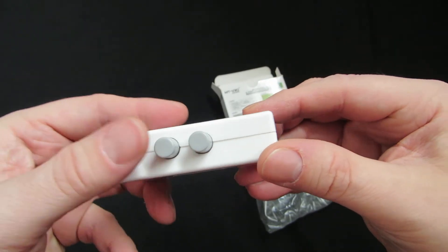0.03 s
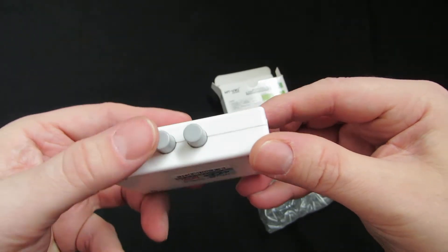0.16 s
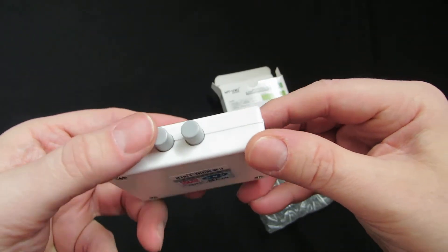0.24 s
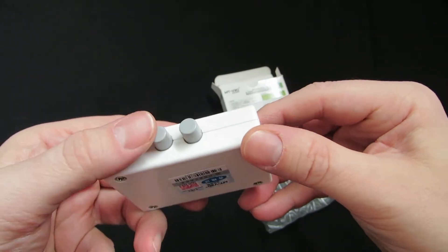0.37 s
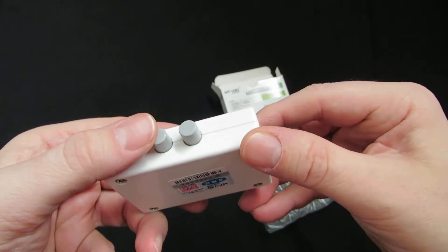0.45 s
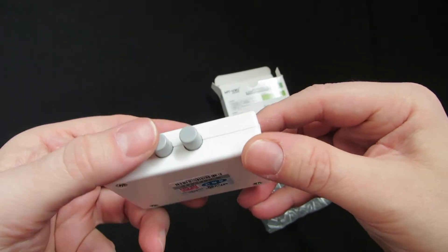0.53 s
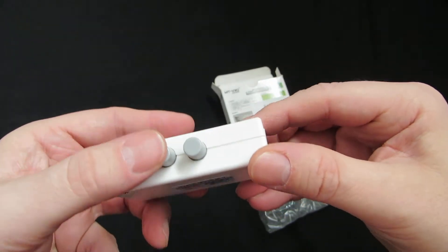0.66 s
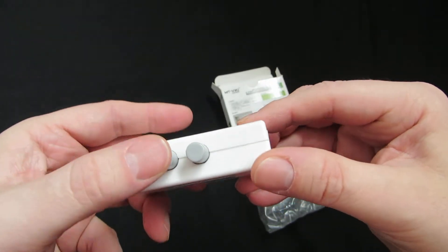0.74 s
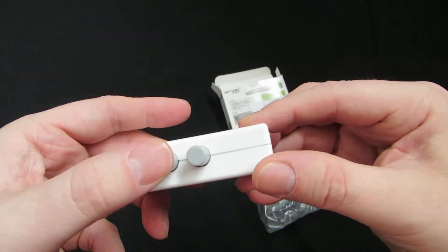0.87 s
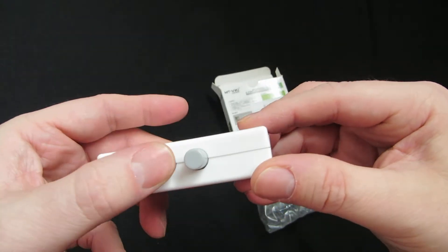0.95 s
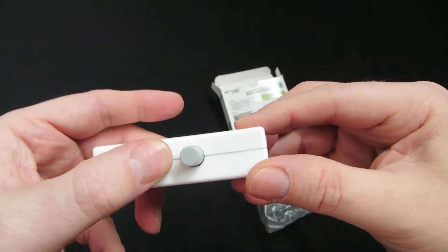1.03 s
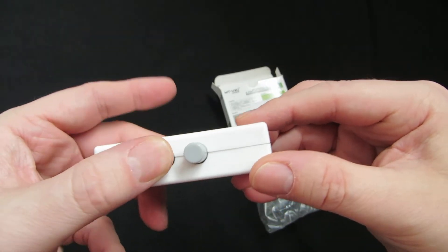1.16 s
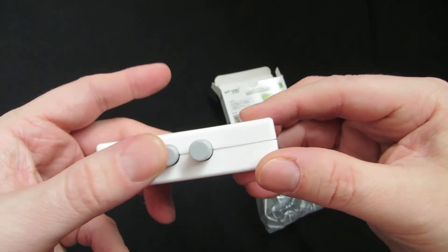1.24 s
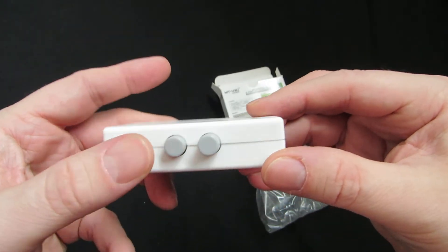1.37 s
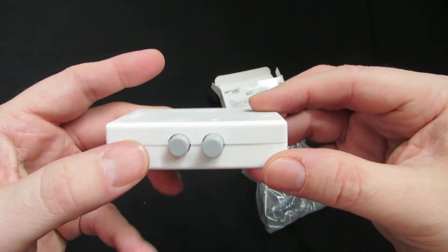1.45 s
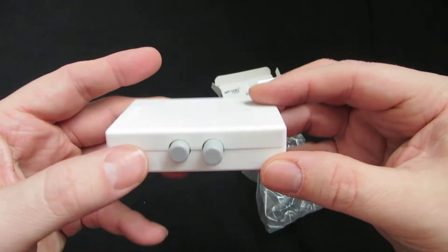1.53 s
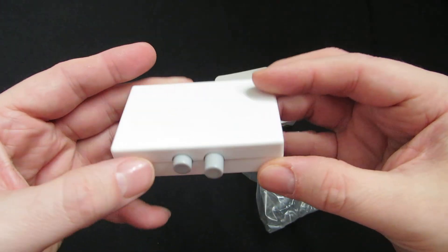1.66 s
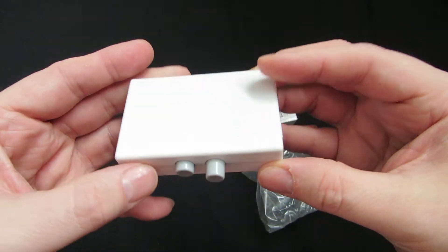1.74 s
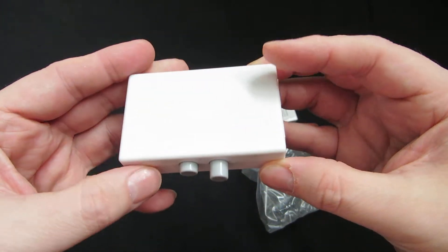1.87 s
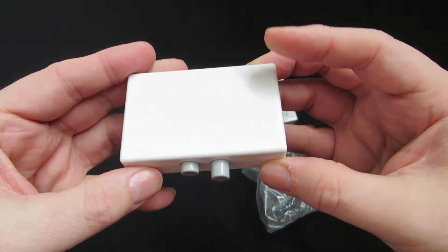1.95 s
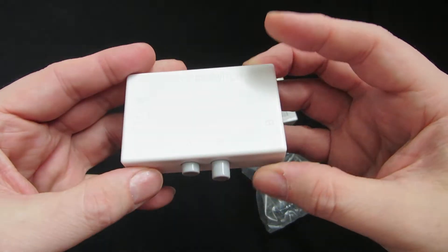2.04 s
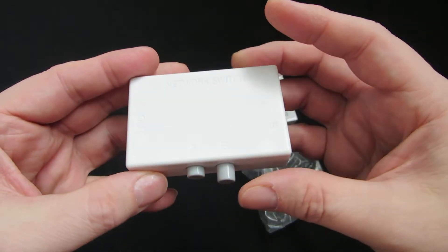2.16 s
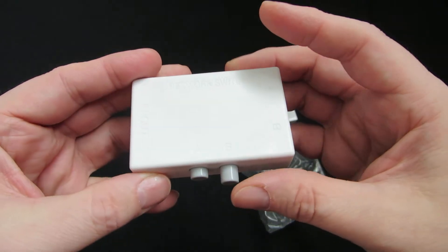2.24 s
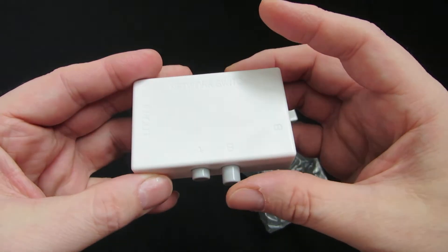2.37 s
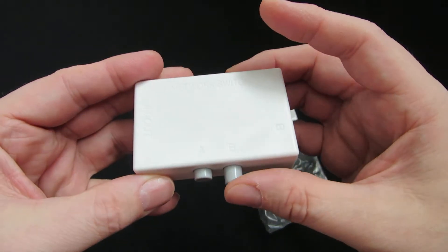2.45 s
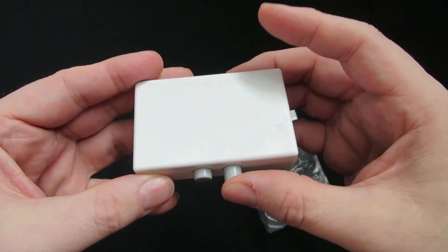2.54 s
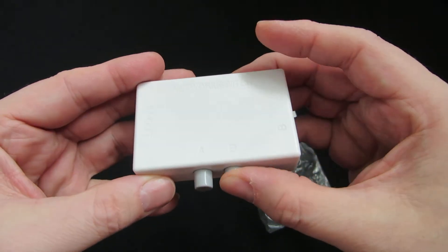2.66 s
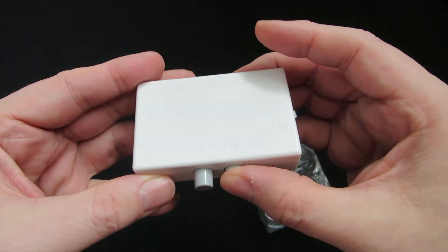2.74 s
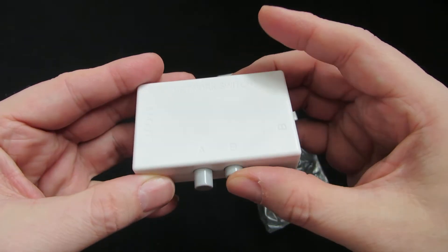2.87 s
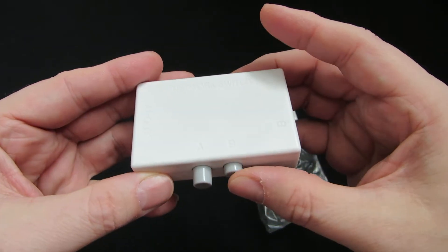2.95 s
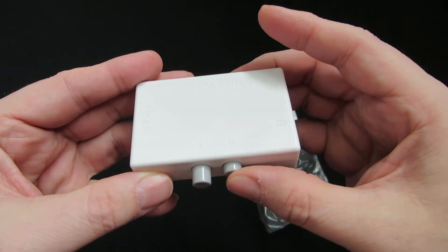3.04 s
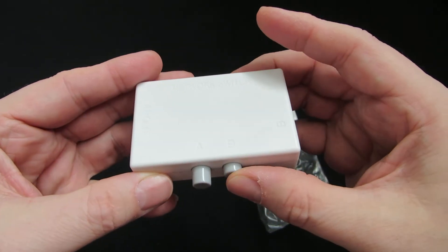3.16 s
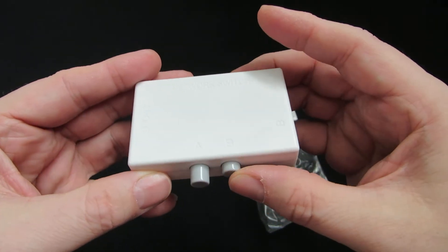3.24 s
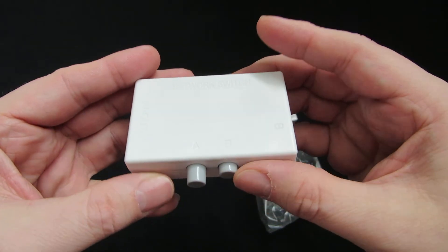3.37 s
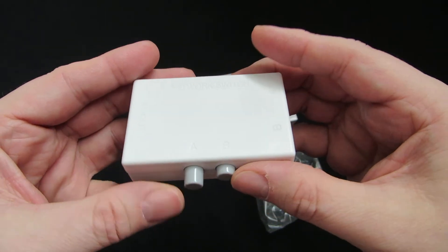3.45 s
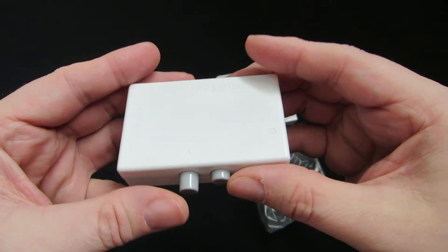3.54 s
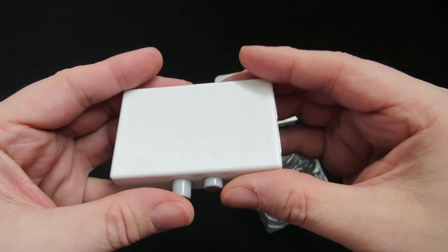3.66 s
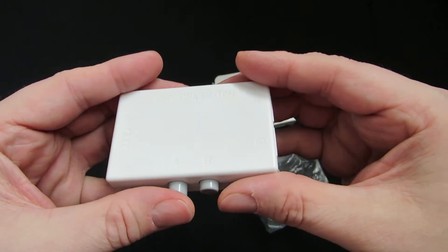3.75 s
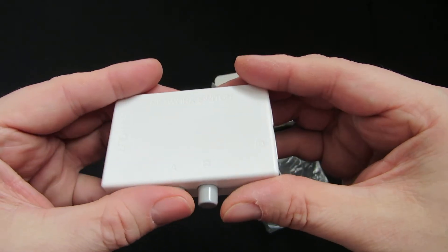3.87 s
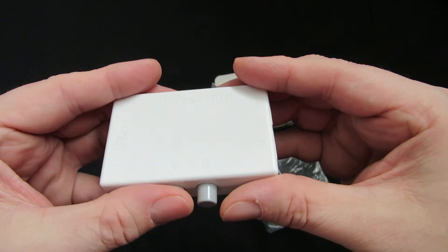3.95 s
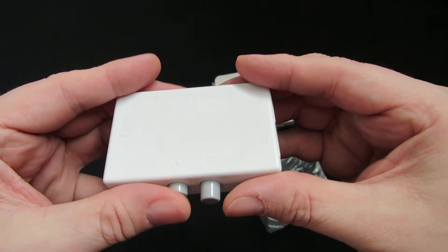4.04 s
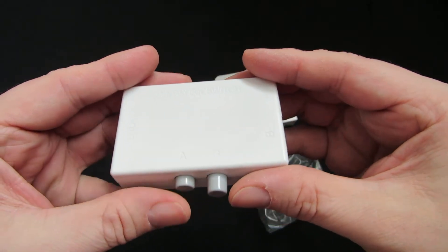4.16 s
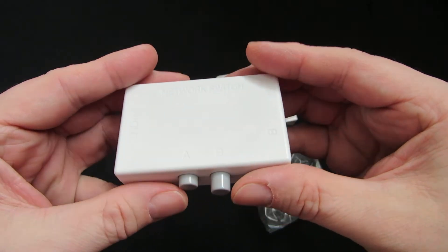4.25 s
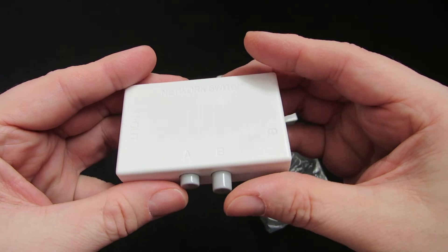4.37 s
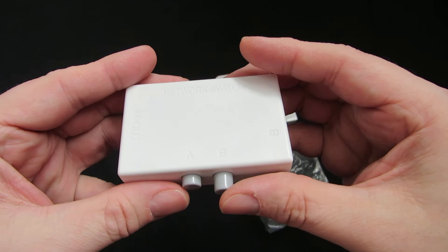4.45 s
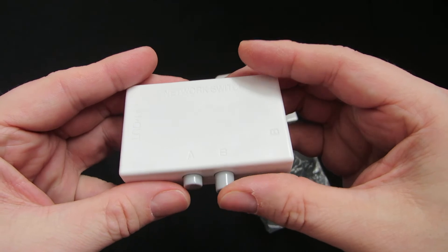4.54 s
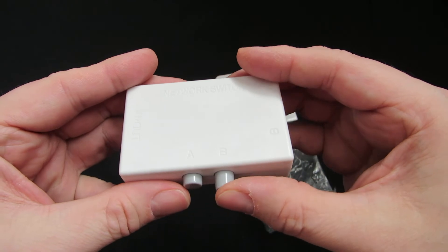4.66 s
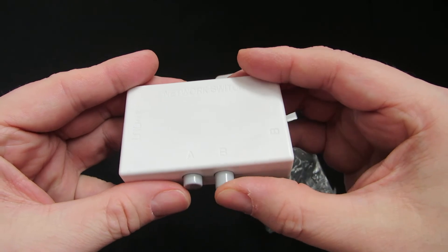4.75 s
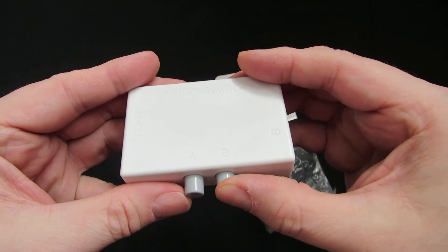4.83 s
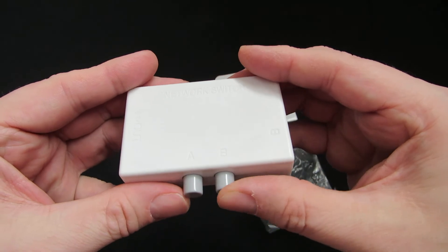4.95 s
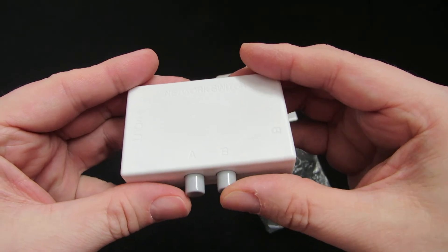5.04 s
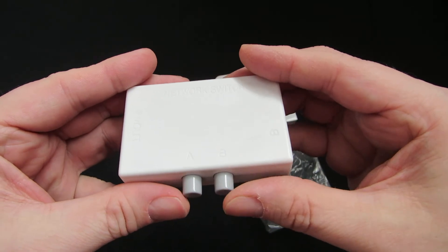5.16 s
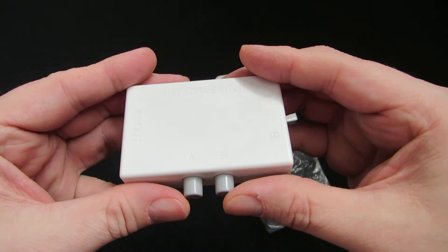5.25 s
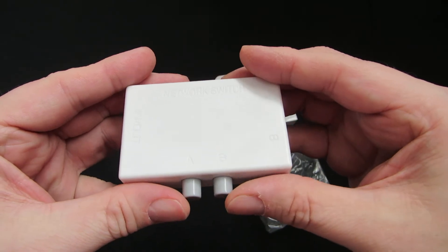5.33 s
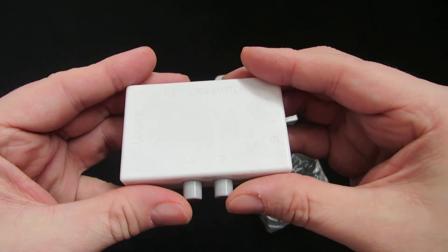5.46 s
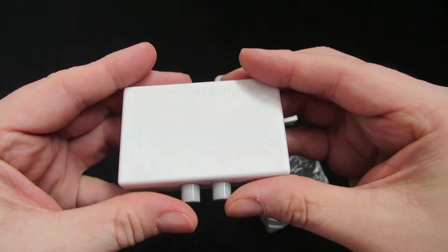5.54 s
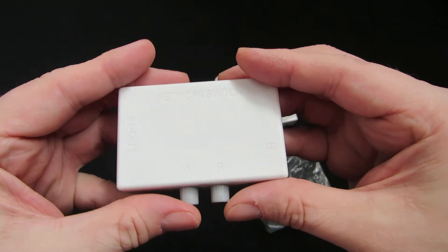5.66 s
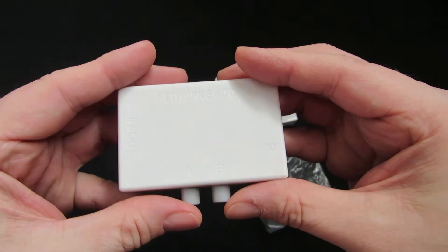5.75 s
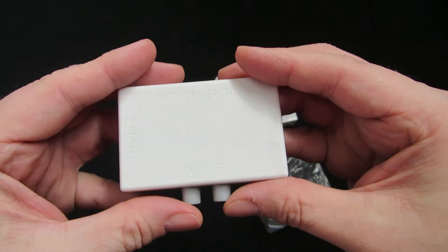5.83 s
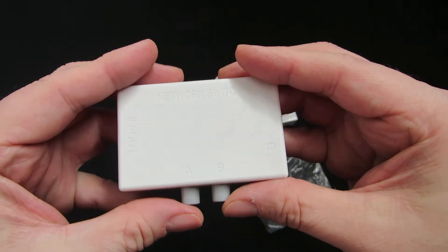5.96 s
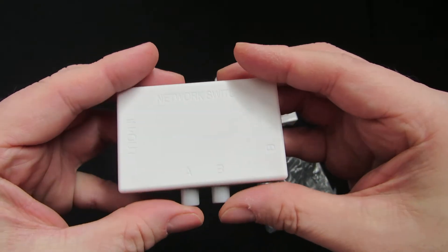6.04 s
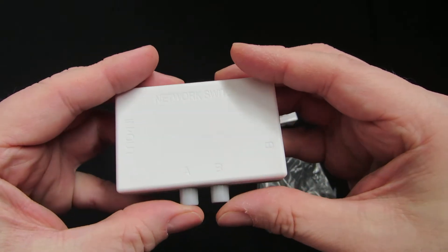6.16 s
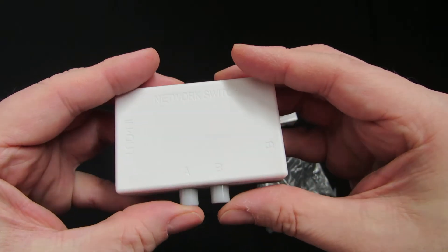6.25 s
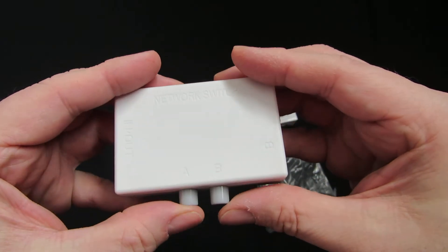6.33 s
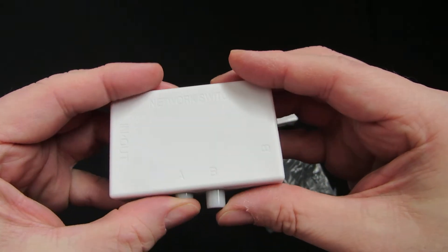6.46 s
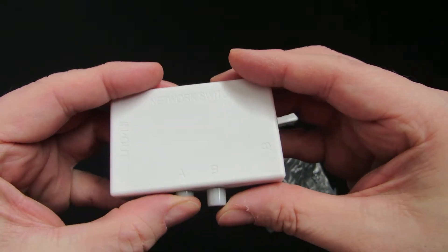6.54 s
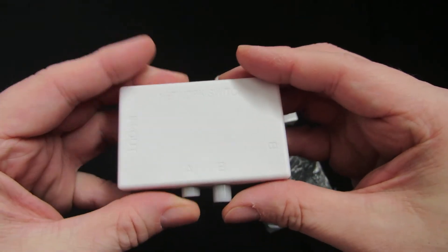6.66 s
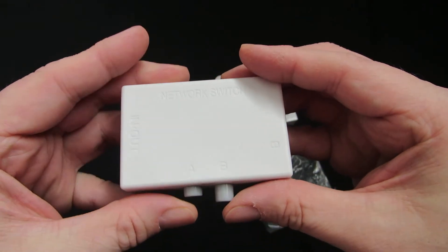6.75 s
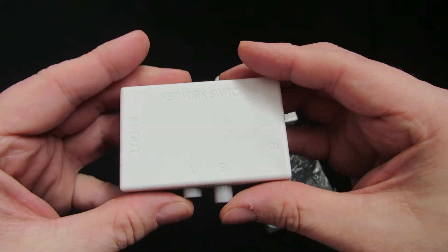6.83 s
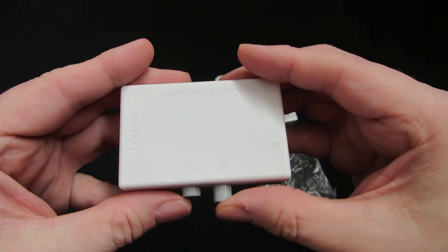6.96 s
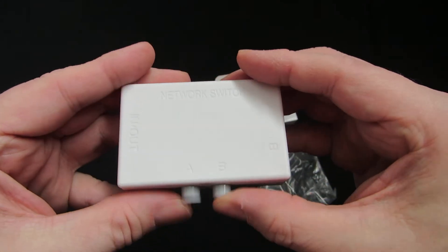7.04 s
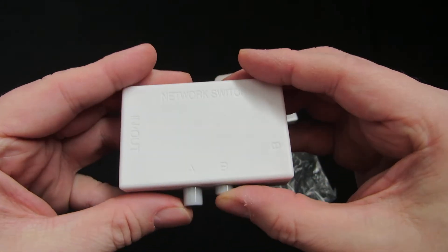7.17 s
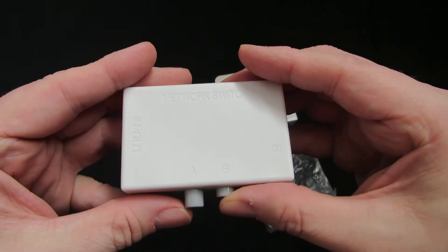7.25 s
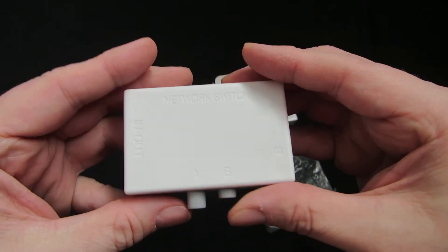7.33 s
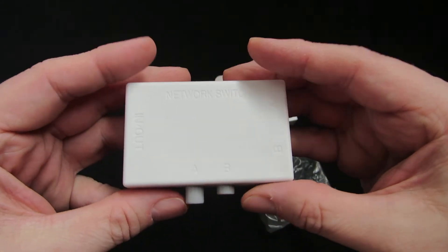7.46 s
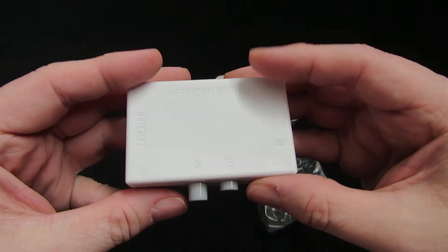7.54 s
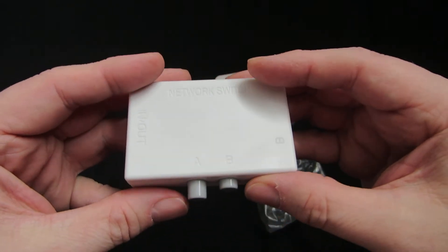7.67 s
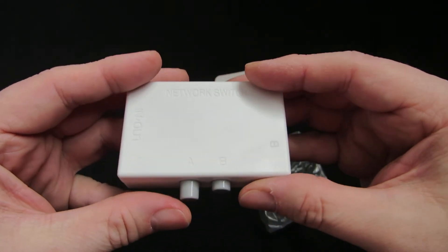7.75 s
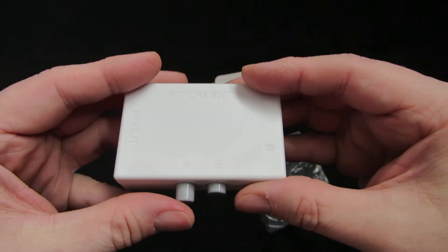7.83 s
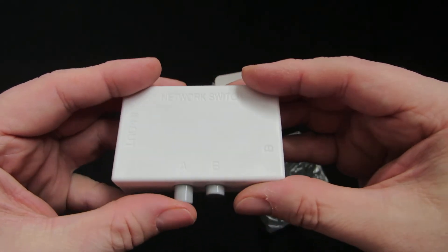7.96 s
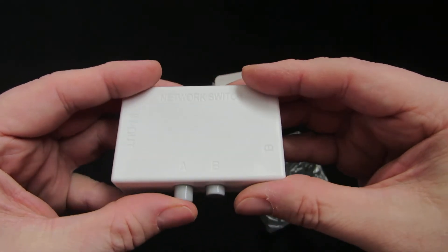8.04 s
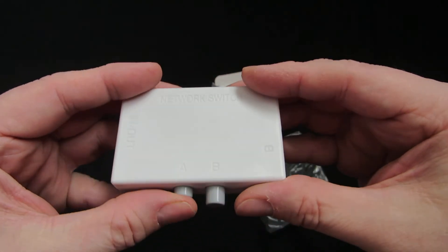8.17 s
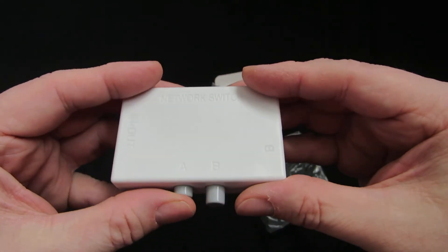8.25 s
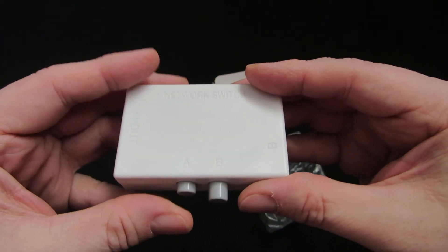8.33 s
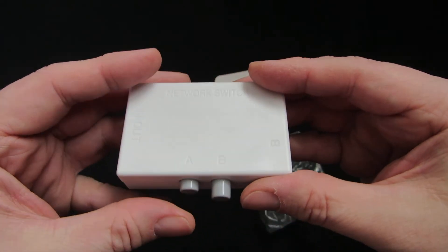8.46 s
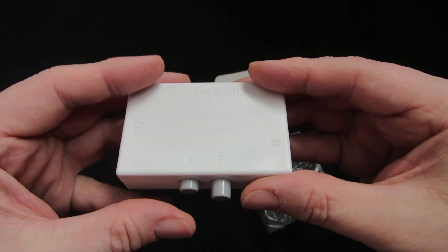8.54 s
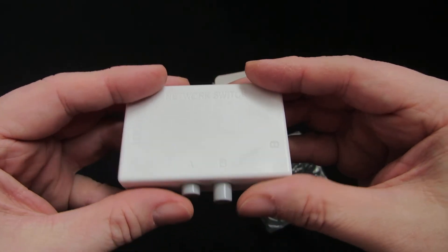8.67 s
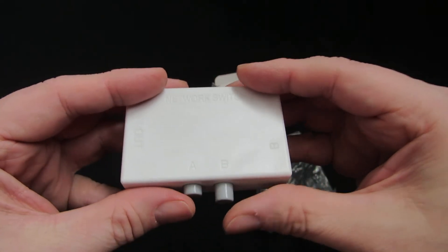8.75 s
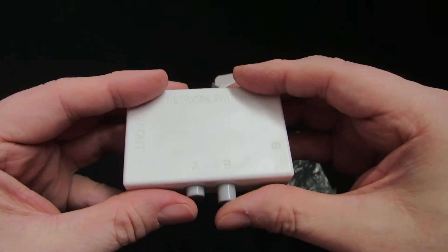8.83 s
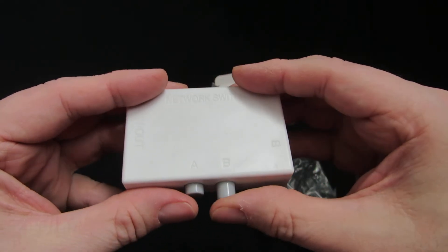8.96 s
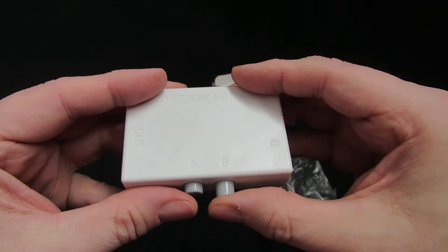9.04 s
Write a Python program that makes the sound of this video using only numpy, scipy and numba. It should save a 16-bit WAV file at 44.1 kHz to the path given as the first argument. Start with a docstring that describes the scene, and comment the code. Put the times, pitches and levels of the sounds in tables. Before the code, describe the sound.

Very close in a small, fairly dry room, thumbs press stiff latching buttons on a little hollow plastic box. Hard, bright clacks come singly or in clusters of small ticks, separated by pauses of a second or so. Brief gritty plunger scrapes lead into some snaps, and a faint steel spring sings after the harder ones. Steady wide microphone hiss lies underneath.

```python
"""A small room: thumbs work two latching push buttons on a little hollow plastic box, close to a camera.
Each impact is a short burst of rattling force driven through the ringing modes of the shell.
Plunger scrapes are swelling grit through the same shell; after some hard snaps steel springs sing as sines.
A short noise tail is the room; wide coloured noise and a faint whine are the camera's hiss.
The camera ducks its gain after loud peaks, clips hard and cuts the extreme top."""
import sys
import numpy as np
from scipy import signal
from scipy.fft import rfft, irfft, next_fast_len
from scipy.io import wavfile
from scipy.ndimage import uniform_filter1d, minimum_filter1d
from numba import njit

SR = 44100
rng = np.random.default_rng(int(sys.argv[2]) if len(sys.argv) > 2 else 0)


def waveform_to_disk(signal):
    """Save audio, clipped to [-1, 1], as 16-bit WAV at the path in sys.argv[1]."""
    frames = np.transpose(np.atleast_2d(signal))
    scaled = np.clip(frames, -1, 1) * 32767
    samples = np.round(scaled).astype(np.int16)
    wavfile.write(sys.argv[1], SR, samples)


N = 401310

# microphone noise colour, sum and difference of the channels: [f/Hz, density level/dB]
HISS_MID_COLOUR = [(12, -40.5), (20, -6.5), (55, 0), (187, -6.5), (222, -5), (366, -5), (573, -8),
                   (1000, -2), (1480, -8), (1610, -8), (4940, -12.5), (11100, -18.5), (16000, -24.5)]
HISS_SIDE_COLOUR = [(12, -35.5), (20, -9.5), (68, -2.5), (234, -1), (277, 0.5), (356, -1.5), (471, -3.5),
                    (737, 1), (6910, -17.5), (13900, -29), (16000, -32)]
# button parts hitting their stops, levels ahead of pan and bass cut:
# [t/s, level/dB, low knock re snap/dB, shell thump re snap/dB, bright tick re snap/dB, rattle decay/ms]
IMPACTS = [(0.9071, -43, -15.5, -25, -11, 0.6), (0.9687, -32, -26, -28, -14, 3.1),
           (0.9721, -29.5, -6, -17, -6, 1.7), (1.0083, -13.5, -15, -5.5, -10.5, 0.92),
           (1.0113, -13.5, -11.5, -2, -6, 1.1), (1.2214, -41.5, 4, 2, -2, 4.2),
           (1.2257, -26.5, -4, -0.5, -16, 4.1), (1.233, -29, -3, -0.5, -6.5, 2.3),
           (2.618, -42, 3.5, 1, -11, 1.56), (2.6431, -37, -30, -34, -25, 0.8),
           (2.6813, -6.5, -2, 1.5, -2, 0.59), (2.7116, -18.5, -2, -6, -5, 3.7),
           (2.722, -17.5, -5.5, -1, -4, 3.5), (2.8156, -35, -18, -17, -9, 3), (2.8188, -28.5, 5, 0, 4, 2),
           (3.919, -34, 6, 1.5, -17.5, 3.1), (3.9252, -6.5, -1.5, -2.5, -3.5, 1.54),
           (4.0207, -38.5, 8, 1.5, -13, 2.7), (4.7449, -44, 1, -13, -20, 2.2),
           (4.858, -7, -4.5, -5, -9, 0.65), (4.978, -20, -0.5, -9, -14.5, 0.89),
           (6.3972, -26, -6.5, -9.5, -5, 0.7), (6.4258, -37.5, 20, -1, -1, 3),
           (6.433, -36.5, -11, -11, 6, 2.7), (6.4496, -16, 1, -7, 2, 1.2),
           (6.451, -17.5, -10, -5, -27, 3.3), (6.6565, -39, 5, 1, -9, 2.5),
           (6.6621, -28.5, -1, -6.5, -6.5, 5), (6.6673, -25.5, -1.5, -3, -22, 3.9),
           (7.029, -45.5, 17, 0, -5, 1.2), (7.0593, -40.5, -18, -28, -24, 0.84),
           (7.104, -10.5, -8, -5.5, -7.5, 1.07), (7.1341, -15.5, -6.5, -9.5, -3, 3.7),
           (7.2094, -37, 2.5, -9, -10, 4.4), (7.2328, -27.5, 4.5, -11, -5, 4),
           (7.236, -25, 12.5, 3, 11.5, 1.33), (8.2003, -6, -1, 0.5, -5.5, 0.8),
           (8.2217, -29.5, -5, -7, 3, 2.5), (8.227, -16.5, -10, -5, -6.5, 3.2)]
# modes of the hollow plastic shell: [f/Hz, level/dB, t60/s]
SHELL_MODES = [(805, -5, 0.015), (832.6, -19, 0.085), (1065, -6.5, 0.0027), (1233, 0.5, 0.0097),
               (1566, -3, 0.015), (1860, -7, 0.013), (2220, -0.5, 0.0085), (2666, -5, .01),
               (2995, -2.5, 0.014), (3322, -1.5, 0.011), (3856, -1.5, 0.0092), (4304, -2, 0.01),
               (4740, -2, 0.0083), (5260, -3, 0.0061), (5900, -3.5, 0.0052), (6607, -2.5, 0.0066),
               (7357, -1.6, 0.005), (7970, -2.5, 0.0083), (9030, 2, 0.0042), (10420, -0.4, 0.0038),
               (11280, -1.5, .004), (13600, -1, .003), (14860, -1.5, .003)]
# plunger sliding in its guide, levels ahead of pan and bass cut: [start t/s, end t/s, rms level/dB]
PLUNGER_SLIDES = [(0.977, 1.005, -42), (1.2, 1.215, -61), (2.62, 2.678, -50.5), (3.893, 3.93, -46.5),
                  (4.763, 4.85, -58.5), (4.95, 4.979, -41), (6.399, 6.444, -50.5), (6.636, 6.658, -60),
                  (7.057, 7.114, -51), (8.172, 8.201, -51)]
# coil spring partials, one list per button: [f/Hz, t60/s]
SPRING_MODES = [
    [(1453, 13), (2159, 3.2), (2912, 2.8), (4366, 1.6)],
    [(1470, 16), (2196, 0.9), (2939, 4.1), (4145, .4)],
]
# spring rings, 2 s at most: [t/s, button index, lowest mode stilled t/s, upper modes stilled t/s,
# then level/dB of each of the four modes, ahead of swell, pan and bass cut]
SPRING_RINGS = [(1.012, 1, 1.6, 4.8, -71, -50, -77, -66), (2.683, 0, 3.4, 3.38, -57, -47.5, -52, -74.5),
                (3.927, 1, 4.67, 4.6, -54, -37, -61.5, -76.5),
                (4.860, 0, 5.4, 5.28, -52.5, -52.5, -48.5, -54.5),
                (6.452, 1, 6.8, 8.3, -73, -55, -85, -82.5), (8.202, 1, 9.1, 9.04, -56, -37, -69.5, -80)]

HISS_MID_DB, HISS_SIDE_DB = -58, -46.0  # rms
WHINE_HZ, WHINE_WIDTH_HZ, WHINE_DB = 1007, 5.7, -71
# the snap sounds higher while the buttons face the camera, lower once the lid is turned to it
SNAP_FACING_HZ, SNAP_TURNED_HZ, TURNED_S = 4410, 3300, 1.5
VALLEY_HZ, VALLEY_DB = 2200, -4.5  # dip between thump and snap, re their mean
EDGE_DB, EDGE_PER_TICK = -4, 0.89  # the very top follows the bright tick
RISE_MS, RISE_PER_RATTLE = 0.75, 0.77  # longer rattles also build up more slowly
BOX_PAN_DB, SPRING_PAN_DB = -4, -1.5  # left minus right: a little right of centre
ROOM_T60_S, ROOM_DB, ROOM_SIDE_DB, ROOM_TOP_HZ = 0.18, -12.5, -8.5, 8880  # side re mid
ROOM_WARM_HZ, ROOM_WARM_DB = 1000, -3.5
MIC_CUT_HZ, TOP_HZ = 674, 15900


def undb(db):
    """Decibels to an amplitude factor."""
    return 10 ** (np.asarray(db) / 20)


def fade(t, t60):
    """Exponential decay that loses 60 dB in t60 seconds."""
    return np.exp(-np.log(1000) * t / t60)


def add(out, sound, s, pan_db):
    """Mix a one- or two-channel sound in from time s on."""
    i = int(s * SR)
    sound = sound[..., :N - i]
    out[:, i:i + sound.shape[-1]] += sound * undb([[pan_db / 2], [-pan_db / 2]])


def coloured(table, db):
    """Steady noise shaped to a spectrum table and set to an rms level."""
    hz, shape_db = np.transpose(table)
    size = next_fast_len(N)
    f = np.maximum(np.arange(size // 2 + 1) * SR / size, 1)
    white = rfft(rng.standard_normal(size))
    colour = undb(np.interp(np.log(f), np.log(hz), shape_db))
    noise = irfft(white * colour, size)[:N]
    return noise * undb(db) / np.std(noise)


def hiss():
    """Microphone noise, widened so the channels are mostly opposite, and a faint wavering whine."""
    # narrowly filtered noise wavers by itself
    peak = signal.iirpeak(WHINE_HZ, WHINE_HZ / WHINE_WIDTH_HZ, fs=SR)
    whine = signal.lfilter(*peak, rng.standard_normal(N))
    mid = coloured(HISS_MID_COLOUR, HISS_MID_DB) + whine * undb(WHINE_DB) / np.std(whine)
    side = coloured(HISS_SIDE_COLOUR, HISS_SIDE_DB)
    return np.array([mid + side, mid - side]) * undb([[-.3], [.3]])


def shell(bands_db, chance, snap_hz=SNAP_TURNED_HZ):
    """One blow's ring in each channel; grip and contact point shift every mode a little."""
    hz, db, t60 = np.array(SHELL_MODES).T[:, :, None]
    t = np.arange(4096) / SR
    # bands: knock, thump, valley, snap, tick, edge
    bands_hz = [800, 1400, VALLEY_HZ, snap_hz, 7500, 12500]
    colour_db = np.interp(np.log(hz), np.log(bands_hz), bands_db)
    # short waves beam unevenly, so high modes lean to one side or the other
    lean_db = 2.2 * hz / 10000 * chance[2] * np.array([1, -1])[:, None, None]
    hz = np.minimum(hz * (1 + 0.0047 * chance[0]), .45 * SR)
    # neighbouring modes swing in opposite directions
    swing = (-1) ** np.arange(len(SHELL_MODES))[:, None]
    gain = undb(db + colour_db + 1.8 * chance[1] + lean_db) * swing
    return np.sum(gain * fade(t, t60) * np.sin(2 * np.pi * hz * t), axis=1)


def gritty(chance, spread_db):
    """Dense tiny impacts, a few much larger than the rest."""
    return chance[0] * undb(spread_db * chance[1])


def even(force):
    """Level the broad colour of a force, so that it shakes all modes alike."""
    spectrum = rfft(force)
    broad_power = uniform_filter1d(np.abs(spectrum) ** 2, size=21)
    return irfft(spectrum / np.sqrt(broad_power), len(force))


def clicks():
    """Parts snap against their stops: a fast build-up, then a rattle; also one plain blow each for the room."""
    out, blows = np.zeros((2, N)), np.zeros((2, N))
    lead_s = .008  # space for the build-up
    ms = 1000 * (np.arange(1024) / SR - lead_s)
    after = np.maximum(ms, 0)
    grit = rng.standard_normal((len(IMPACTS), 2, len(ms)))
    grip = rng.standard_normal((len(IMPACTS), 3, len(SHELL_MODES), 1))
    for (s, db, knock_db, thump_db, tick_db, rattle_ms), g, h in zip(IMPACTS, grit, grip):
        rise_ms = max(RISE_MS + RISE_PER_RATTLE * rattle_ms, .3)
        rise = np.clip(1 + ms / rise_ms, 0, 1) ** 1.4
        rattle = np.exp(-after / max(rattle_ms, .2))
        # loose parts chatter on a little after the snap
        chatter = undb(-13.0) * np.exp(-after / 2.4)
        push = rise * (rattle + chatter)
        # a contact cannot sound before the parts meet
        force = even(push * gritty(g, 2.5)) * (push > 0)

        snap_hz = SNAP_FACING_HZ if s < TURNED_S else SNAP_TURNED_HZ
        valley_db = thump_db / 2 + VALLEY_DB
        edge_db = EDGE_DB + EDGE_PER_TICK * tick_db
        ring = shell([knock_db, thump_db, valley_db, 0, tick_db, edge_db], h, snap_hz)
        sound = signal.fftconvolve(force[None], ring, axes=1)
        # the level is that of the loudest 4 ms
        loudest = uniform_filter1d(np.mean(sound ** 2, axis=0), size=176).max()
        sound *= undb(db) / np.sqrt(loudest)
        add(out, sound, s - lead_s, BOX_PAN_DB)
        # the plain blow carries the same energy
        add(blows, ring * np.linalg.norm(sound) / np.linalg.norm(ring), s, 0)
    return out, blows


def room(near):
    """A short diffuse tail, duller than the source and mostly centred."""
    t = np.arange(SR // 2) / SR
    # nearby surfaces send uneven clumps of echoes
    clumps = uniform_filter1d(rng.standard_normal(len(t)), size=100) * np.sqrt(100)
    onset = np.clip((t - .003) / 0.00096, 0, 1)
    tail = rng.standard_normal((2, len(t))) * undb(0.53 * clumps) * fade(t, ROOM_T60_S) * onset
    tail = signal.sosfilt(signal.butter(1, ROOM_TOP_HZ, fs=SR, output="sos"), tail)
    warmth = signal.sosfilt(signal.butter(2, ROOM_WARM_HZ, fs=SR, output="sos"), tail)
    tail += undb(ROOM_WARM_DB) * warmth
    tail *= undb([[ROOM_DB], [ROOM_DB + ROOM_SIDE_DB]]) / np.sqrt(np.sum(tail[0] ** 2))
    mid, side = signal.fftconvolve(near.mean(axis=0)[None], tail, axes=1)[:, :N]
    return np.array([mid + side, mid - side]) * undb([[-1.3], [1.3]])


def slides():
    """Plastic scrapes on plastic, harder toward the end of the stroke."""
    out = np.zeros((2, N))
    count = 4410  # longest stroke, in samples
    grit = rng.standard_normal((len(PLUNGER_SLIDES), 2, count))
    grip = rng.standard_normal((len(PLUNGER_SLIDES), 3, len(SHELL_MODES), 1))
    for (start, end, db), g, h in zip(PLUNGER_SLIDES, grit, grip):
        stroke = np.linspace(0, 1, min(int((end - start) * SR), count))
        scrape = stroke ** 0.66 * gritty(g[:, None, :len(stroke)], 7.1)
        ring = shell([4.0, 0.5, -2.5, -3.0, -7.0, -19.0], h)
        sound = signal.fftconvolve(scrape, ring, axes=1)
        add(out, sound * undb(db) / np.std(sound[:, :len(stroke)]), start, BOX_PAN_DB)
    return out


def springs():
    """Clean steel partials that swell out of the blow and fade slowly, some until a touch stills the coil."""
    out = np.zeros((2, N))
    phases = rng.random((len(SPRING_RINGS), 4))  # in turns
    t = np.arange(2 * SR) / SR
    swell = 1 - np.exp(-t / 0.026)
    for (s, button, low_end, high_end, *levels_db), turns in zip(SPRING_RINGS, phases):
        ends = [low_end, high_end, high_end, high_end]
        modes = SPRING_MODES[int(round(button))]
        ring = np.zeros(len(t))
        for (hz, t60), db, end, turn in zip(modes, levels_db, ends, turns):
            touch = np.clip((end - s - t) / 0.1, 0, 1)
            ring += undb(db) * fade(t, t60) * touch * np.sin(2 * np.pi * (hz * t + turn))
        add(out, ring * swell, s, SPRING_PAN_DB)
    return out


def scene():
    """Box, room and springs through the microphones' steep bass cut, with the hiss on top."""
    noise = hiss()
    snaps, blows = clicks()
    scrapes = slides()
    box = snaps + scrapes + room(blows + scrapes) + springs()
    bass_cut = signal.butter(6, MIC_CUT_HZ, "high", fs=SR, output="sos")
    return signal.sosfilt(bass_cut, box) + noise


@njit
def follow(goal_db, fall, rise):
    """Gain in dB that falls quickly toward its goal and climbs back slowly."""
    out, g = np.empty(len(goal_db)), 0.
    for i in range(len(goal_db)):
        g += (goal_db[i] - g) * (fall if goal_db[i] < g else rise)
        out[i] = g
    return out


def record(dry):
    """Gain control that reacts just too late for the peak, hard clipping, then the top is cut."""
    power = signal.lfilter([1 / 312.0], [1, 1 / 110.0 - 1], np.mean(dry ** 2, axis=0))
    over_db = np.maximum(10 * np.log10(power + 1e-12) + 17.48, 0)
    # the detector holds its highest reading for 150 ms
    held_db = -minimum_filter1d(-over_db, size=6615, origin=3307)
    gain_db = follow(-1.4 * held_db, 1 / (0.014 * SR), 1 / (.35 * SR))
    clipped = np.clip(dry * undb(gain_db), -1, 1)
    top_cut = signal.ellip(8, .2, 60, TOP_HZ, fs=SR, output="sos")
    return np.clip(signal.sosfilt(top_cut, clipped), -1, 1)


dry = scene()
out = record(dry)
waveform_to_disk(out)
```